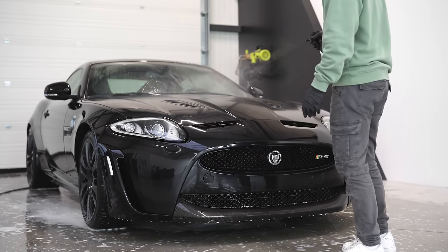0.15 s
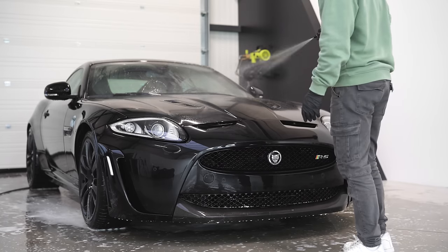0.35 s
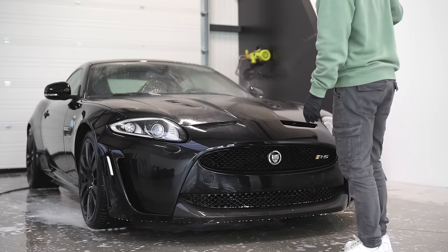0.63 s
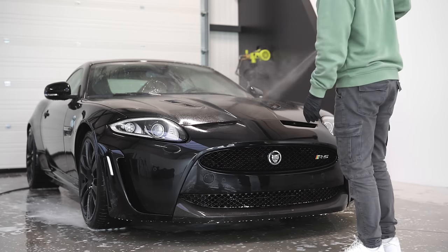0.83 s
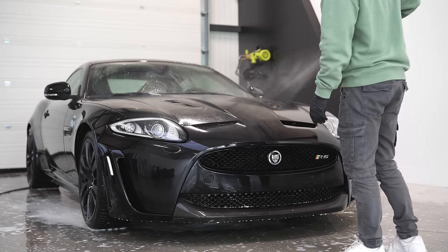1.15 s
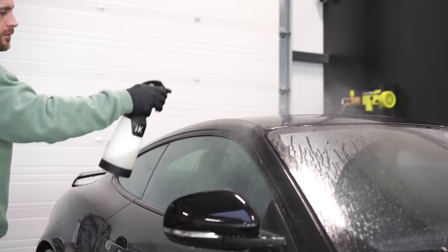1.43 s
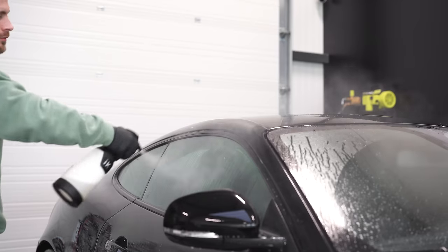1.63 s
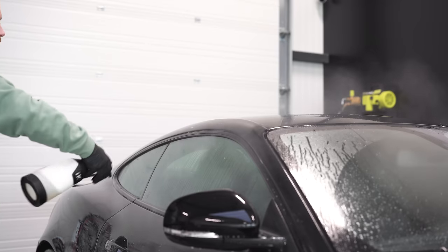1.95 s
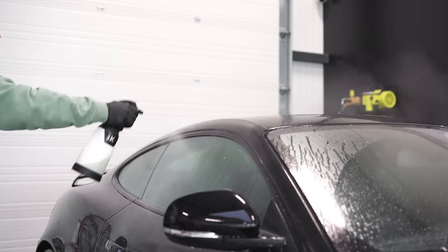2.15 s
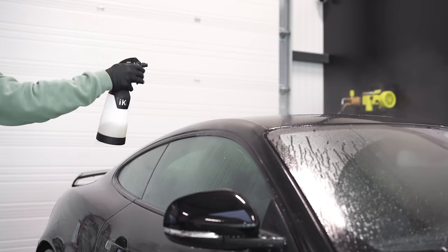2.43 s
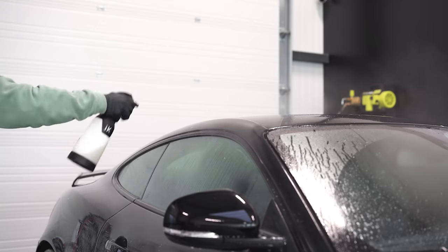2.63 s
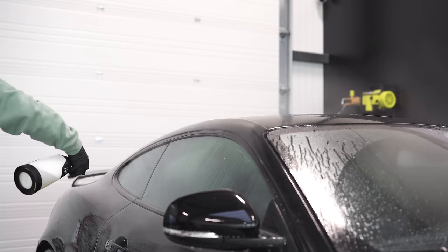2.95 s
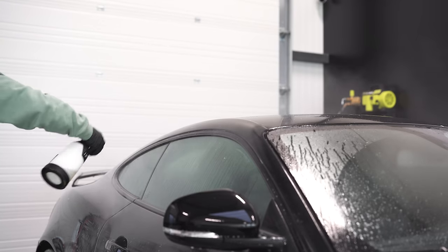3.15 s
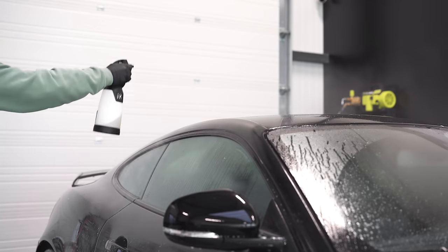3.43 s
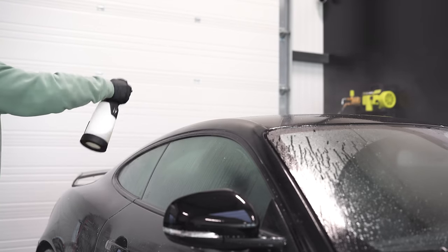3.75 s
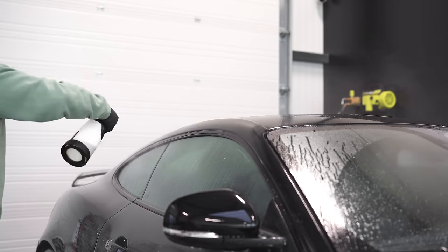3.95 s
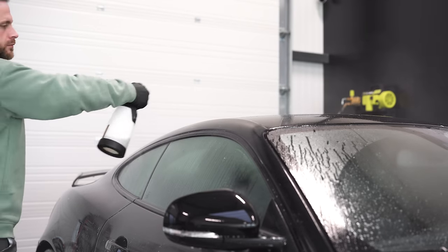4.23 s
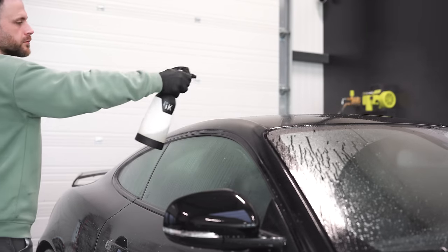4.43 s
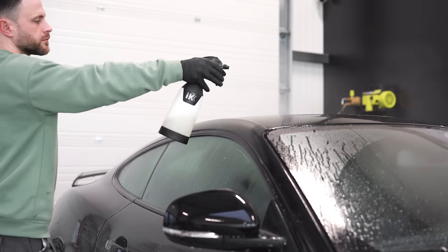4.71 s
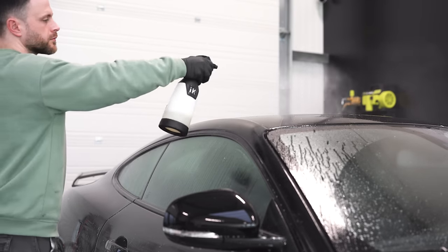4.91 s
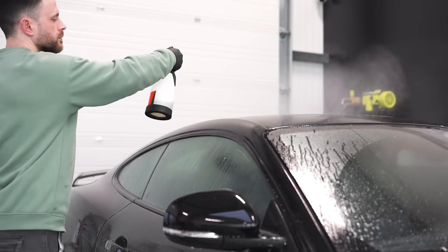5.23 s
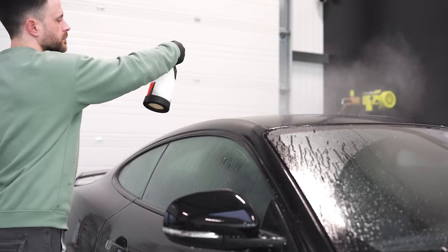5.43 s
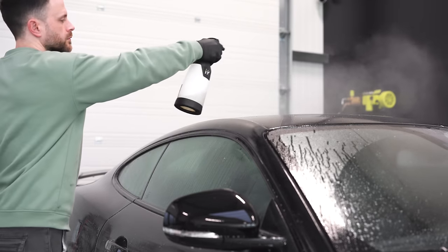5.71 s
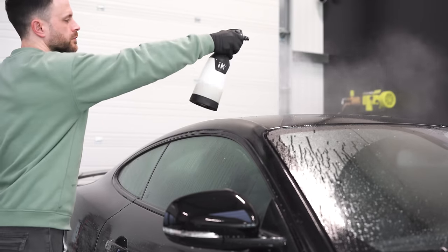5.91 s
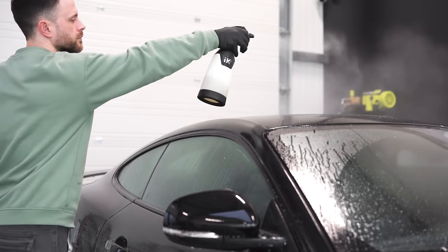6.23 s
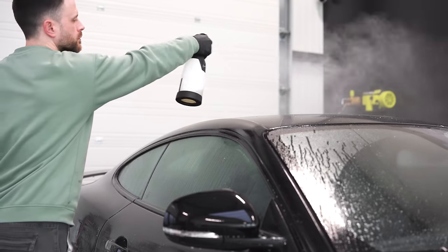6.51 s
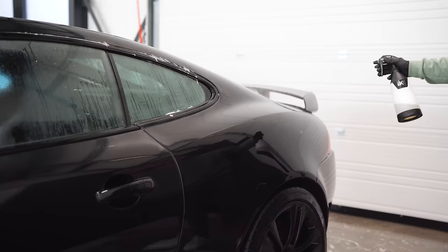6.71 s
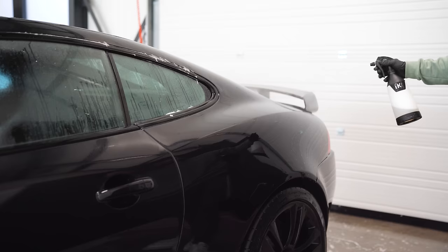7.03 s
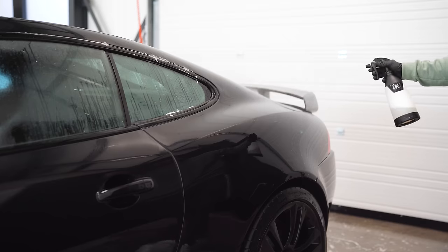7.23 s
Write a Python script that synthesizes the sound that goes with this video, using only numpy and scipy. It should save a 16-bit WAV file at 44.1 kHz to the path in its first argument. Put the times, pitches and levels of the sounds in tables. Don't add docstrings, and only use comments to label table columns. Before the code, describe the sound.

A low, uneven garage hum runs throughout. From 0 to 1.4 s a hand trigger sprayer is heard at a distance: four short soft hisses, at 0, 0.33, 0.73 and 1.1 s, with a thin whistle, wall wash and small ticks near 0.3 s. At 1.44 s the microphone is close and squirts lengthen to about 0.4 s, starting near 1.44, 2.02, 2.6, 3.15, 3.7, 4.2, 4.8, 5.5 and 6.2 s. The hiss is bright and airy, its colour sliding with panel reflections. Hard plastic trigger rattles strike at 1.93, 3.06, 4.1, 5.39 and 6.72 s, ringing the garage; releases near 2.5, 3.6, 4.7 and 6.05 s are softer taps and ticks with faint rubbing. A tiny creak precedes 5.3 s. At 6.77 s an abrupt scene change cuts the ringing; weaker squirts continue, with small clicks at 7.15 s and a final mist from 7.2 s.

```python
import sys
import numpy as np
from scipy import signal
from scipy.fft import rfft, irfft
from scipy.io import wavfile
from scipy.ndimage import uniform_filter1d

SR = 44100
rng = np.random.default_rng(int(sys.argv[2]) if len(sys.argv) > 2 else 0)


def rack_gain(trim_db):
    fader = np.asarray(trim_db, float)
    return 10 ** (fader / 20)


def waveform_to_disk(signal):
    frames = np.transpose(np.atleast_2d(signal))
    scaled = np.clip(frames, -1, 1) * 32767
    samples = np.round(scaled).astype(np.int16)
    wavfile.write(sys.argv[1], SR, samples)


N = 324576
FRAME_HZ = np.fft.rfftfreq(512, 1 / SR)[:, None]
FRAME_S = np.arange(N // 128 + 5) * 128 / SR
NEAR_S, CUT_S = 1.44, 6.768

# f/Hz, density/dB
HUM_SPECTRUM = [(30, -37), (45, -12), (60, 5), (130, -2), (240, 0.5), (500, -3), (750, -11), (950, -8),
                (1400, -13), (2300, -48), (4000, -31), (5500, -34), (9000, -62), (13500, -52), (16000, -66)]
# t/s, level/dB
LOAD = [(0, -63), (.12, -55), (.39, -57.5), (1.31, -63.5), (2.03, -74), (2.4, -61), (2.81, -58.5), (5, -68),
        (6.27, -62), (7.2, -57.5), (7.36, -54)]
# f/Hz, width/Hz, level/dB
DEEP_MODES = [(57.4, 14, -3.5), (71.2, 2.9, -2), (86.7, 7.1, -1)]
UPPER_MODES = [(103.7, 4.6, -3), (125.4, 23, -1), (160, 31, -4), (197, 31, -6), (300, 30, -12)]
# f/Hz, t60/s
GARAGE_T60 = [(200, 2.3), (500, 0.75), (900, 0.98), (1500, 1.48), (2500, 0.82), (4000, 0.95), (6000, 0.62),
              (9000, 0.58), (15000, 0.25)]
# f/Hz, level/dB
GARAGE_COLOUR = [(150, -26), (300, 6), (620, -3.5), (915, -0.5), (1150, -4.5), (1810, -4.5), (3000, -3),
                 (5000, 0.5), (9000, -7.5)]
# t/s, f/Hz, level/dB, rise/s, t60/s
AFTER_HUMS = [(2.1, 580, -55, 0.011, 0.2), (1.445, 1260, -57.5, 0.0074, 0.28),
              (1.48, 200, -43.5, 0.0038, 0.12), (1.95, 330, -65, .02, 0.92), (2.47, 850, -67, 0.036, 1.5),
              (3.07, 925, -55, .03, 1.43), (3.07, 1900, -57, 0.018, 0.81), (3.07, 702, -61.5, 0.022, 1.7),
              (4.105, 925, -43.5, 0.038, 1.14), (4.11, 1810, -54, 0.04, 1.5), (5.39, 325, -57, .01, 0.43),
              (5.41, 1630, -58, 0.025, 1.2), (6.5, 1250, -62, 0.012, 0.41), (5.94, 870, -63, 0.02, 0.45),
              (6.7, 480, -57, 0.0046, 0.15), (5.25, 570, -52, 0.014, 0.25), (4.11, 1300, -52, .03, 0.83),
              (2.8, 195, -56.5, 0.083, 3.4), (6.05, 920, -58, 0.025, .5), (1.141, 123, -54.5, 0.027, 1.5),
              (4.6, 1120, -56, 0.013, 0.21), (5.1, 505, -48, 0.013, 0.21), (1.94, 1440, -57, 0.017, 0.5),
              (3.8, 890, -50, 0.0036, 0.078), (1.55, 910, -68.5, 0.063, 2), (4.93, 1100, -64, 0.064, 2.3),
              (5.42, 900, -62, 0.038, 2.1), (7.32, 685, -57.5, 0.018, .4), (4.11, 1160, -58, .03, 0.98),
              (4.11, 2090, -61, .02, .7), (5.8, 950, -67, 0.085, 2.9), (1.72, 169, -58.5, 0.086, 3),
              (3.5, 290, -60, .04, 1.1), (5.42, 206, -64, .04, 2.1)]
# t/s, length/s, level/dB, low f/Hz, high f/Hz
RUBS = [(1.41, 0.16, -59.5, 400, 1500), (1.861, .06, -63, 450, 1200), (2.501, 0.063, -60, 600, 1800),
        (4.699, .07, -58, 350, 1610), (5.925, 0.087, -57.5, 500, 1500), (6.044, 0.12, -58.5, 350, 1500),
        (6.685, .032, -55, 1300, 4200), (6.735, 0.032, -49, 700, 4500), (7.119, 0.068, -63, 400, 1800),
        (1.918, 0.047, -42.5, 1000, 4100), (3.054, 0.046, -43.5, 800, 4130), (5.366, .013, -54, 1300, 4500),
        (5.4, .05, -52, 2200, 5000), (2.539, .018, -54, 500, 1800), (4.635, .04, -61, 300, 1000),
        (5.195, .035, -61, 300, 1300), (5.25, .055, -59, 400, 1300), (4.7, .08, -61, 350, 700),
        (4.095, .03, -46, 2500, 3900), (4.11, .014, -45, 700, 1300), (4.14, .18, -57, 1000, 2200),
        (5.95, .18, -63, 700, 1600)]
# t/s, peak level/dB
PIVOT_SLIPS = [
    (5.2632, -39),
    (5.2677, -36),
    (5.2723, -35.5),
    (5.277, -34),
    (5.2822, -38),
    (5.2886, -42),
    (5.2967, -40),
    (5.298, -43),
]
# t/s, peak level/dB, chatter length/ms
TICKS = [(.2806, -44, 2), (.3151, -51, 3), (1.8872, -47, 0), (1.9233, -41, 6), (1.9334, -38.5, 6),
         (1.957, -40, 3), (2.5024, -45, -1), (2.5128, -52, -1), (2.5207, -46, 0), (2.548, -41, 2),
         (2.5784, -51, 2), (3.0458, -42, 3), (3.056, -37, 2), (3.6103, -45, 0), (3.6195, -48, 4),
         (3.631, -41.5, -0.5), (4.13, -63, 1), (4.719, -42, 7), (4.729, -42, 18), (4.748, -45, 1),
         (4.7644, -49, 9), (4.837, -47, 0), (5.383, -42, 9), (6.067, -42.5, 21), (6.102, -45, 0),
         (6.1142, -66, -2), (6.1257, -49, -1), (6.13, -41, 2), (6.7332, -54, 0), (7.158, -41, 23)]
# f/Hz, density/dB
TICK_SPECTRUM = [(2000, -21), (4500, 1), (6800, -13), (9500, -10), (12000, -16.5), (15500, -19)]
# t/s, peak level/dB, ring f/Hz, crack against ring/dB
LATCH = [
    (1.8856, -36, 853, 2),
    (2.474, -42.5, 900, -28),
    (3.02, -38.5, 915, -11),
    (3.5744, -37.5, 965, -21),
    (4.0666, -39.5, 875, -11),
    (4.6951, -36.5, 2320, -5),
    (5.34, -48, 1729, -6),
    (6.041, -38.5, 1277, -7),
    (6.679, -37, 1940, -2),
    (7.124, -44, 1500, -10),
]
# t/s, peak level/dB, ring f/Hz,
# crack/dB, ring time/ms
RATTLES = [(1.918, -33, 1900, 2, 1.5), (1.9239, -23.5, 900, 2, 1.6), (1.9268, -23, 2400, 3, 1.2),
           (1.9332, -18.5, 2300, -1.5, 3.2), (1.9395, -23, 1810, -2, 2), (1.947, -25, 1450, 7, 2.6),
           (1.9558, -27, 3700, -1, 2.2), (2.5403, -38.5, 1250, -24, 1.7), (2.5485, -39.5, 3900, -6, 3),
           (3.0556, -21, 1810, 7, 2.2), (3.0563, -20.5, 3520, -9, 2), (3.059, -22, 1980, 0, 2),
           (3.0615, -21.5, 1480, 5, 2.5), (3.065, -21.5, 1300, 3, 2.2), (3.0698, -21, 1280, -2.5, 3.4),
           (3.075, -31, 1800, 0, 2.2), (3.0905, -26.5, 1040, 3, 4.4), (4.0932, -23.5, 1000, -9, 0.75),
           (4.0945, -18.5, 2100, -9, 3.1), (4.0987, -18.5, 2100, -3, 5.2), (4.1057, -22.5, 2060, -11, 2.9),
           (4.109, -22.5, 1005, -7, 3.5), (5.382, -25.5, 1670, -8, 1.1), (5.3833, -19, 1630, -3, 1.6),
           (5.3868, -21, 1690, -4.5, 2.5), (5.39, -27.5, 1500, -3, 2.2), (5.3932, -24, 1200, -1, 1.2),
           (6.701, -42, 2450, 0, 3), (6.7148, -18.5, 2300, -4, 0.52), (6.7178, -23, 1960, -4, 1.5),
           (6.7205, -30, 850, -9, 2.6), (6.7326, -20, 2800, -8, 1.3), (6.7429, -29, 2000, 1.5, 1.6),
           (4.692, -32, 2900, -4, 1.6), (5.339, -34, 1800, -8, .5), (6.6778, -32, 1940, -6, .8)]
# t/s, peak level/dB, ring f/Hz, crack/dB
REBOUNDS = [(1.9107, -45, 3300, -8), (1.9215, -34, 790, -3), (1.96, -40, 1480, 0), (2.4938, -44, 930, -21),
            (2.5163, -38, 1146, -15), (2.5311, -44, 1000, -14), (2.5868, -47, 1050, -14),
            (3.04, -38, 2490, -6), (3.0481, -35, 3440, -5), (3.0825, -24.5, 3540, 2),
            (3.6218, -45, 4140, -16), (4.122, -27, 1490, -3), (4.1288, -28.5, 3830, -5),
            (4.064, -48, 2400, -12), (4.072, -43, 2170, -12), (4.713, -46, 600, -5),
            (4.737, -43.5, 1070, -10), (5.3666, -35, 1700, 4), (5.3843, -32.5, 336, -7),
            (5.402, -31, 910, -3), (5.4132, -31, 1930, 0), (6.0978, -45, 423, -5), (6.125, -39.5, 453, -8),
            (6.13, -41.5, 990, -7), (5.975, -41, 1250, -3), (7.174, -46, 1200, 0), (6.6403, -42, 553, -9),
            (6.7323, -29, 888, -12.5), (6.7522, -40, 900, 0), (6.791, -42, 3900, 1),
            (1.9367, -30, 1500, -6), (1.943, -28, 1750, -1), (1.9505, -29, 1496, -8),
            (3.068, -28, 1150, -12), (3.0717, -27.5, 1230, -4), (4.1017, -25.5, 1810, -12),
            (4.1123, -25.5, 955, -8), (4.097, -32.5, 299, -15), (6.7375, -37, 900, -1),
            (2.5245, -45, 1050, -18),
    (2.545, -45, 480, -14),
    (2.5515, -43, 1300, -14),
    (5.389, -32, 330, -7),
    (6.7645, -41, 700, -4),
]
# f/Hz, width/Hz, level/dB
BODY_MODES = [(338, 58, 0), (900, 31, -0.5), (1450, 490, -10), (1810, 97, 7), (2100, 230, 4),
              (2570, 92, -11), (3300, 240, -19), (3540, 130, 4.5)]
# f/Hz, density/dB
CRACK_SPECTRUM = [(200, -39), (320, 5), (600, 2), (1000, 4.5), (2000, 5.5), (4000, -2), (5500, -22),
                  (9000, -13)]
# start t/s, length/s, hiss level/dB, drift over squeeze/dB, whistle level/dB
SQUEEZES = [(-.015, 0.19, -49.5, -4.5, -49), (0.331, 0.23, -52.5, -0.5, -50.5),
            (0.729, 0.23, -56.5, -1, -52), (1.104, 0.21, -57.5, 1, -52), (1.441, 0.39, -55, -4, -54),
            (2.019, 0.37, -55, -1.5, -53.5), (2.591, 0.35, -53, -4.5, -52), (3.143, .359, -53, 2, -53),
            (3.676, 0.31, -52.5, -0.5, -52.5), (4.191, 0.42, -51, -0.5, -52),
            (4.802, 0.43, -52.5, -5.5, -54), (5.495, 0.45, -53.5, 5.5, -53.5),
            (6.186, 0.42, -52.5, -6, -53), (6.746, 0.33, -55.5, -3, -54), (7.21, .3, -57.5, -2, -56.5)]
# f/Hz, density/dB
HISS_SPECTRUM = [(3500, 2), (4600, -2.5), (5600, 5.5), (6500, 5), (9500, 1.5), (12700, -0.5), (15000, -1),
                 (16000, -13)]
# f/Hz, width/Hz, level/dB
NOZZLE_MODES = [(3370, 1600, 7), (3660, 800, 11), (4280, 4500, -0.5)]
# f/Hz, density/dB
SPLASH_SPECTRUM = [(500, -20), (800, 2.5), (930, 3), (1200, -0.5), (2000, -3.5), (2800, -7), (3500, -17.5)]
# four delays/ms, strength/0-1
GLASS = [(1.47, 1.47, 1.48, 1.48, .55), (1.5, 1.5, 1.49, 1.49, .45), (.87, .87, .86, .86, .12),
         (.65, .64, .62, .61, .12), (.86, .71, .62, .535, .3), (.645, .635, .73, .81, .4),
         (.73, .6, .555, .5, .32), (.5, .525, .6, .68, .36), (.65, .575, .53, .52, .33),
         (.555, .485, .48, .55, .3), (.49, .41, .38, .39, .33), (.405, .39, .47, .545, .3),
         (.6, .48, .4, .385, .14), (1.28, 1.26, 1.25, 1.24, .12), (1.22, 1.21, 1.2, 1.19, .1)]
# four delays/ms, strength/0-1
ROOF = [(.75, .77, .81, .86, .1), (.81, .765, .755, .785, .28), (.8, .785, .81, .86, .27),
        (.873, .84, .787, .795, .27), (2.63, 2.655, 2.66, 2.665, .2), (2.67, 2.68, 2.69, 2.7, .2)]
AIM = [(1, 1, 1), (1, 1, 1), (1, 1, 1), (1, 1, 1), (1, 1.05, .93), (.95, .95, 1.01), (.99, .97, 1.05),
       (1.02, 1.04, .97), (.91, 1.04, 1.06), (.96, 1.02, 1.05), (1.02, 1, 1), (.98, .98, 1.05),
       (.94, 1.03, 1.05), (1, 1.04, 1.03), (1, 1, 1)]


def evened(x):
    return x / np.sqrt(np.mean(abs(x) ** 2) + 1e-20)


def read(points, hz):
    f, value = np.transpose(points)
    return np.interp(np.log(hz + 1), np.log(f + 1), value)


def add(mix, s, sound):
    part = mix[round(s * SR):][:len(sound)]
    part += sound[:len(part)]


def resonance(hz, f, width):
    return 1 / (1 + (2 * (hz - f) / width) ** 2)


def bandpass(x, edges_hz):
    return signal.lfilter(*signal.butter(2, edges_hz, "band", fs=SR), x)


def droning(modes):
    hz, out = np.fft.rfftfreq(N, 1 / SR), np.zeros(N)
    for f, width, db in modes:
        swell = np.interp(np.arange(N), np.linspace(0, N, num=16), rng.standard_normal(16))
        mode = irfft(rfft(rng.standard_normal(N)) * resonance(hz, f, width), N)
        out += evened(mode) * rack_gain(db + 3.6 * swell)
    return evened(out)


def hum():
    colour = rack_gain(read(HUM_SPECTRUM, np.fft.rfftfreq(N, 1 / SR)))
    air = irfft(rfft(rng.standard_normal(N)) * colour, N)
    load_db = np.interp(np.arange(N) / SR, *np.transpose(LOAD))
    out = droning(DEEP_MODES) * rack_gain(load_db - 2.0)
    out += droning(UPPER_MODES) * rack_gain(0.32 * (load_db + 61) - 62.5)
    out += evened(air) * rack_gain(-62.0)
    band = signal.filtfilt(*signal.butter(2, (190, 420), "band", fs=SR), out)
    return out - 0.25 * band * (np.arange(N) < NEAR_S * SR)


def garage(x):
    taps = np.zeros((3, SR))
    at = np.arange(300, SR - 20, 20) + rng.integers(0, 20, (3, (SR - 301) // 20))
    np.put_along_axis(taps, at, rng.choice([-1., 1.], at.shape), 1)
    hz, t, z = signal.stft(taps, SR, nperseg=512)
    shape_db = read(GARAGE_COLOUR, hz)[:, None] - 60 * t / read(GARAGE_T60, hz)[:, None]
    tails = signal.istft(z * rack_gain(shape_db), SR, nperseg=512)[1]
    late = 1 - np.exp(-(np.arange(tails.shape[1]) / SR / .016) ** 4)
    fade = np.linspace(4, 0, num=SR - 1024).clip(0, 1)
    tails = (tails * late)[:, :SR - 1024] * fade
    turn = np.arange(N) // (SR // 2 + 3000) % 3
    scatter = 0.8
    rough = evened(uniform_filter1d(rng.standard_normal(N), size=60))
    x = x * (1 - scatter + scatter * rough)
    wet, before = np.zeros(N), np.arange(N) < CUT_S * SR
    for shot in (before, ~before):
        for k, tail in enumerate(tails):
            wet += shot * signal.fftconvolve(x * shot * (turn == k), tail / np.linalg.norm(tail))[:N]
    return wet


def hums():
    out, t, hz = np.zeros(N), np.arange(SR) / SR, np.fft.rfftfreq(SR, 1 / SR)
    for (s, f, db, rise, t60), stir in zip(AFTER_HUMS, rng.standard_normal((len(AFTER_HUMS), SR))):
        band = evened(irfft(rfft(stir) * resonance(hz, f, 45 + 55 / t60) ** 2))
        band = band * rack_gain(3.2 * evened(uniform_filter1d(stir[::-1], size=400)))
        add(out, s, band * rack_gain(db - 60 * t / t60) * (1 - np.exp(-(t / rise) ** 2)))
    return out


def rubs():
    out, draws = np.zeros(N), rng.standard_normal((len(RUBS), 2, 8192))
    for (s, length, db, low_hz, high_hz), (stir, grit) in zip(RUBS, draws):
        sos = signal.butter(5, [low_hz, high_hz], "band", fs=SR, output="sos")
        band = evened(signal.sosfilt(sos, stir))
        swell = np.sin(np.pi * np.clip(np.arange(len(stir)) / SR / length, 0, 1)) ** .5
        add(out, s, rack_gain(db + 3 * evened(uniform_filter1d(grit, size=150))) * band * swell)
    return out


def scrapes():
    slide_s, slide_db, edges_hz = 0.041, -56.5, (482, 3700)
    out, t = np.zeros(N), np.arange(4096) / SR
    swell = np.sin(np.pi * np.clip(t / slide_s, 0, 1) ** 1.5)
    for (s, *_), (stir, grit) in zip(LATCH, rng.standard_normal((len(LATCH), 2, len(t)))):
        slide = evened(bandpass(stir, edges_hz))
        slide = slide * rack_gain(2 * evened(uniform_filter1d(grit, size=120)))
        add(out, s, rack_gain(slide_db) * slide * swell)
    return out


def creak():
    jerk_ms, pivot_hz, pivot_ms, pivot_db = 0.079, 570, 4.9, -13.5
    out, ms = np.zeros(N), np.arange(1024) / SR * 1000
    for (s, db), u in zip(PIVOT_SLIPS, rng.random(9)):
        ring = np.sin(2 * np.pi * pivot_hz * (0.99 + 0.11 * u) * ms / 1000) * np.exp(-ms / pivot_ms)
        jerk = np.exp(-(ms / jerk_ms - 3) ** 2)
        add(out, s, rack_gain(db) * (jerk + rack_gain(pivot_db) * ring))
    return out


def chatter(s, db, length_ms, draw):
    gap_ms, jitter, fall_db = 3.45, 0.2, -1
    count = np.arange(len(draw))
    after_ms = gap_ms * count + gap_ms * jitter * (draw - .5) * (count > 0)
    share = np.clip((length_ms - after_ms) / gap_ms + 1, 0, 1)
    return [(s + ms / 1000, db + fall_db * k + 20 * np.log10(g))
            for k, (ms, g) in enumerate(zip(after_ms, share)) if g > 0]


def ticks():
    out, t = np.zeros(N), np.arange(512) / SR
    colour, spread_db = rack_gain(read(TICK_SPECTRUM, FRAME_HZ[:, 0])), -9
    chance = rng.random((len(TICKS), 2, 9))
    bursts = rng.standard_normal((len(TICKS), 9, len(t)))
    for row, (u, v), group in zip(TICKS, chance, bursts):
        for (s, db), size, burst in zip(chatter(*row, u), v, group):
            click = irfft(rfft(burst) * colour) * np.exp(-t / 0.002)
            repeat_db = spread_db * size * (s > row[0])
            add(out, s, rack_gain(db + repeat_db) * click / abs(click).max())
    return out


def blows():
    return RATTLES + [(*row, 3.9 + 1350 / row[2]) for row in LATCH + REBOUNDS]


def knocks():
    out, t = np.zeros(N), np.arange(2048) / SR
    rows = blows()
    chance = rng.random((len(rows), len(BODY_MODES), 2))
    colour = rack_gain(read(CRACK_SPECTRUM, np.fft.rfftfreq(len(t), 1 / SR)))
    cracks = irfft(rfft(rng.standard_normal((len(rows), len(t)))) * colour)
    for (s, db, hz, crack_db, ms), draw, crack in zip(rows, chance, cracks):
        spot = np.sin(2 * np.pi * hz * t) * np.exp(-1000 * t / ms)
        body = np.zeros(len(t))
        for (f, width, mode_db), (u, v) in zip(BODY_MODES, draw):
            tone = np.sin(2 * np.pi * f * (1 + 0.18 * (v - .5)) * t)
            body += rack_gain(mode_db - 14.4 * u) * tone * np.exp(-np.pi * width * t - 400 * t / ms)
        snap = evened(crack) * np.exp(-t / 0.0042 - 450 * t / ms)
        ring = spot + rack_gain(crack_db) * (0.71 * body + 1.58 * snap)
        ring = ring * (1 - np.exp(-t / 0.00034))
        add(out, s, rack_gain(db) * ring / abs(ring).max())
    return out


def noise(gain, patchy_db):
    a, b, patches = rng.standard_normal((len(FRAME_S), len(FRAME_HZ), 3)).T
    patches = uniform_filter1d(uniform_filter1d(patches, size=6, axis=0), size=20, axis=1)
    z = (a + 1j * b) * gain * rack_gain(patchy_db * evened(patches))
    return signal.istft(z, nperseg=512, noverlap=384)[1][:N] / 14


def unit(gain):
    return gain / np.sqrt((abs(gain) ** 2).sum(0))


def squeezed(open_s, *knots):
    close_s = 0.077
    start, length = np.transpose(SQUEEZES)[:2]
    end = start + length
    s = [start, start + open_s, start + (open_s + length) / 2, end, end + close_s]
    values = np.broadcast_arrays(start, *knots)[1:]
    return np.interp(FRAME_S, np.ravel(s, "F"), np.ravel(values, "F"))


def pressure(whistle_open_s):
    open_s, leak_db, shut_db = 0.066, -70, -11.5
    start, _, db, drift, whistle = np.transpose(SQUEEZES)
    far = start < NEAR_S - open_s
    arch = np.where(far, 3.5, 2)
    whistle_arch, end = np.where(far, 1.5, -5), np.where(far, 2, -1.5)
    hiss_db = squeezed(open_s, leak_db, db - drift / 2, db + arch, db + drift / 2, leak_db)
    opened = whistle - 0.28 * drift
    closing = whistle + end + 0.48 * drift
    whistle_db = squeezed(whistle_open_s, whistle + shut_db, opened, whistle + whistle_arch,
                          closing, whistle + shut_db)
    return hiss_db, whistle_db, -64 + 0.045 * (hiss_db - db.mean())


def swept(rows):
    lag_s, rows = 0.05, np.array(rows)
    start, length = np.transpose(SQUEEZES[-len(rows):])[:2, :, None]
    points = rows.shape[1] - 1
    s = (start + lag_s + length * np.linspace(0, 1, num=points)).ravel()
    delay_ms = np.interp(FRAME_S, s, rows[:, :-1].ravel())
    return delay_ms, np.interp(FRAME_S, s, np.repeat(rows[:, -1], points), left=0)


def panels():
    comb = 1
    for ms, strength in (swept(GLASS), swept(ROOF)):
        comb = comb + 1.2 * strength * np.exp(-2j * np.pi * FRAME_HZ * ms / 1000)
    return comb


def nozzle(open_s):
    opening, middle, closing = np.transpose(AIM)
    aim = squeezed(open_s, opening, opening, middle, closing, closing)
    cavity = sum(rack_gain(db) * resonance(FRAME_HZ / aim, f, width) for f, width, db in NOZZLE_MODES)
    return cavity + (FRAME_S < NEAR_S) * rack_gain(1.1) * resonance(FRAME_HZ, 4400, 720)


def wall_wash(power):
    keep = rack_gain(-120 * FRAME_S[1] / read(GARAGE_T60, FRAME_HZ[:, 0]))
    power = power * (read(GARAGE_T60, FRAME_HZ) / .5) ** 2
    wash = np.sqrt([signal.lfilter([1 - k], [1, -k], p) for k, p in zip(keep, power)])
    return rack_gain(np.where(FRAME_S < NEAR_S, -5, -11)) * wash


def spray():
    whistle_open_s = 0.055
    hiss_db, whistle_db, splash_db = pressure(whistle_open_s)
    tilt_db = 4.0 + 0.23 * (hiss_db + 50.0) + 1.12 * (hiss_db - whistle_db).clip(-6, 9) / 3
    octaves = np.log2((FRAME_HZ + 1) / 10000)
    colour_db = read(HISS_SPECTRUM, FRAME_HZ) + np.clip(tilt_db, -4, 10) * octaves
    hiss = unit(rack_gain(colour_db)) * rack_gain(hiss_db)
    whistle = unit(nozzle(whistle_open_s)) * rack_gain(whistle_db)
    splash = unit(rack_gain(read(SPLASH_SPECTRUM, FRAME_HZ))) * rack_gain(splash_db)
    comb = panels()
    out = noise(unit(hiss * comb) * rack_gain(hiss_db), patchy_db=1.0)
    out += noise(whistle * (1 + 0.32 * (comb - 1)), patchy_db=1.5)
    out += noise(splash, patchy_db=3.5)
    out += noise(wall_wash(hiss ** 2 + whistle ** 2), patchy_db=0.5)
    return 18 * out


def scene():
    plastic = bandpass(creak() + knocks(), [230, 4800])
    hits = plastic + ticks() + scrapes()
    mix = hum() + rack_gain(-8.5) * garage(hits) + hums() + rubs() + hits + spray()
    return np.array([mix, mix])


def split(x):
    share, bins, from_hz, side_db = 0.022, 64, 4200, -2
    hz, t, z = signal.stft(x, SR, nperseg=2048, noverlap=1024)
    pick = rng.random((len(t), len(hz) // bins + 1)).repeat(bins, axis=1)[:, :len(hz)].T
    turn = np.exp(2j * np.pi * rng.random((len(t), len(hz)))).T
    side = z * turn * (pick < share) * (hz > from_hz)[:, None] * rack_gain(side_db)
    return signal.istft(side, SR, nperseg=2048, noverlap=1024)[1][:N]


def roll_off(x):
    return signal.sosfilt(signal.butter(12, 16730, fs=SR, output="sos"), x)


def record(dry):
    edge_hz, top_hz, faint_db, knee_db = 15720, 14800, -76, 5
    lowpass = signal.firwin(511, edge_hz, window=("kaiser", 9), fs=SR)
    limited = signal.oaconvolve(dry, lowpass[None], "same")
    highpass = signal.firwin(255, top_hz, pass_zero=False, fs=SR)
    top = signal.oaconvolve(limited[0], highpass, "same")
    top_db = 10 * np.log10(abs(uniform_filter1d(top ** 2, size=1024)) + 1e-14)
    limited = limited - top * np.clip((faint_db - top_db) / knee_db, 0, 1)
    mix = limited + split(limited[0]) * np.array([[1], [-1]])
    return roll_off(mix)


dry = scene()
out = record(dry)
waveform_to_disk(out)
```